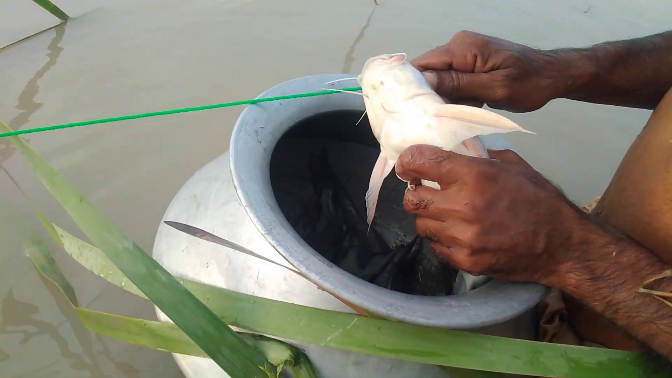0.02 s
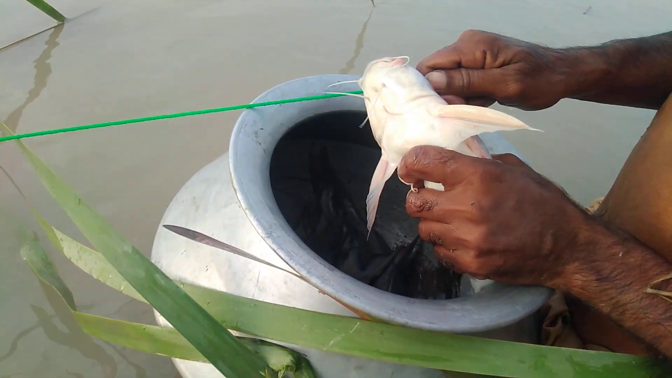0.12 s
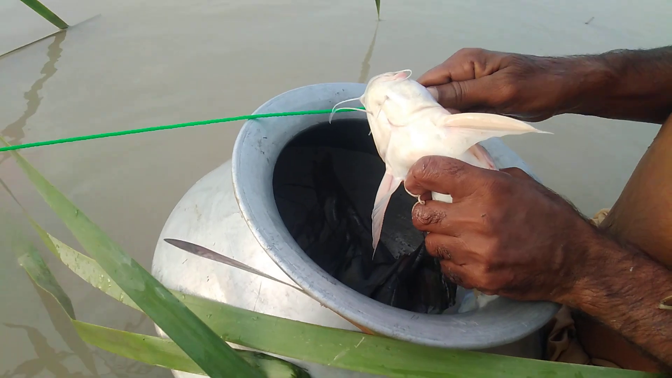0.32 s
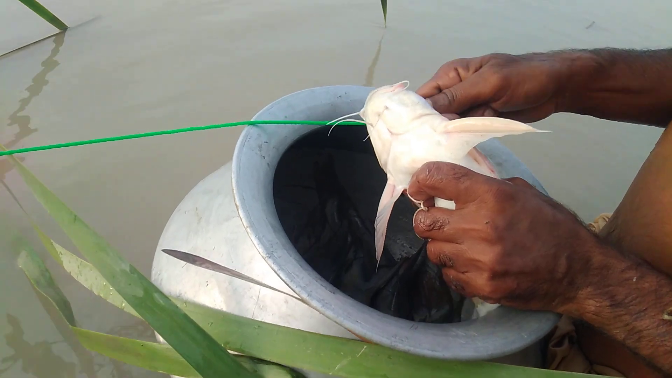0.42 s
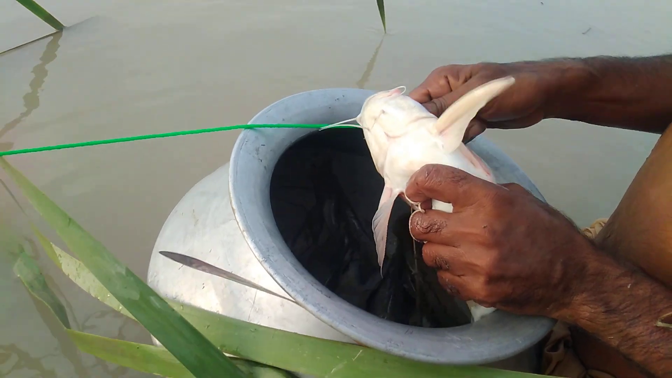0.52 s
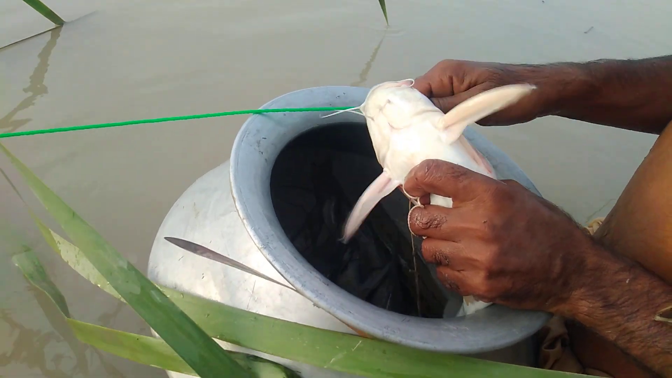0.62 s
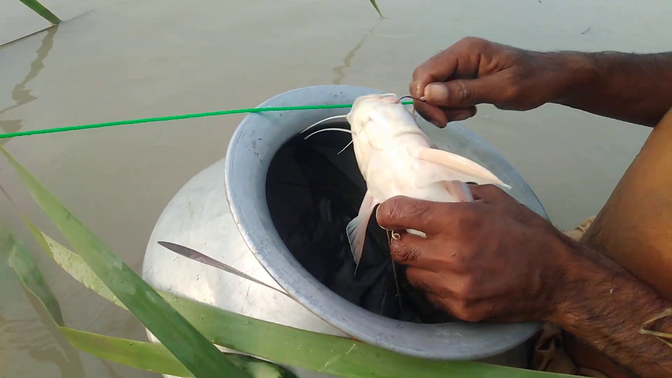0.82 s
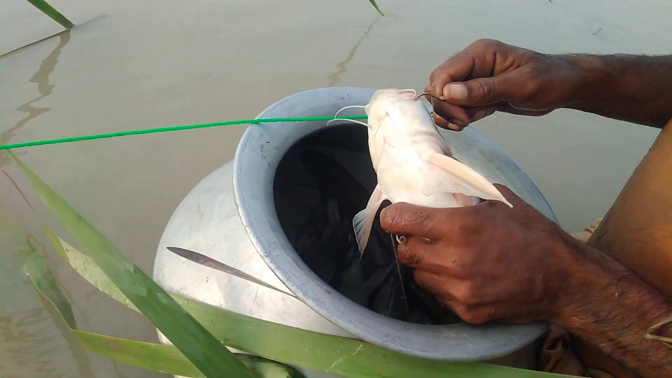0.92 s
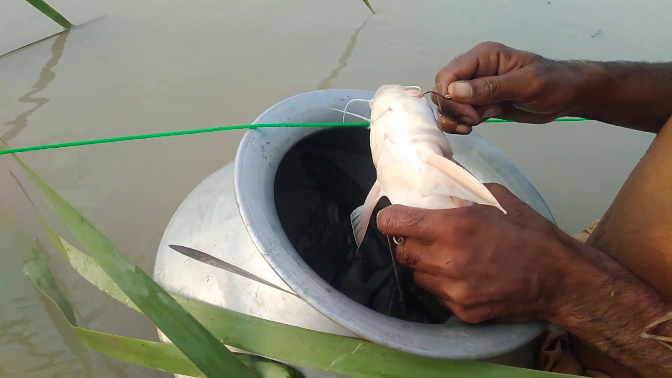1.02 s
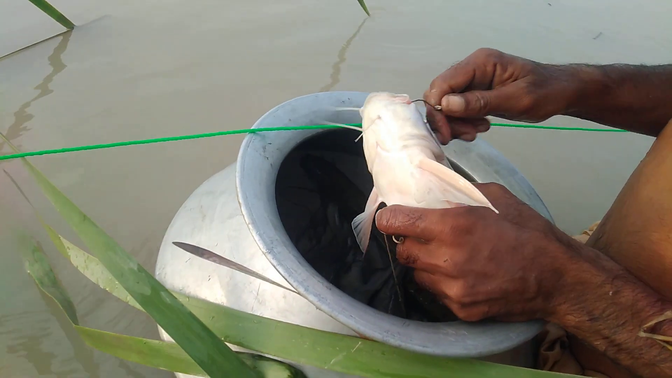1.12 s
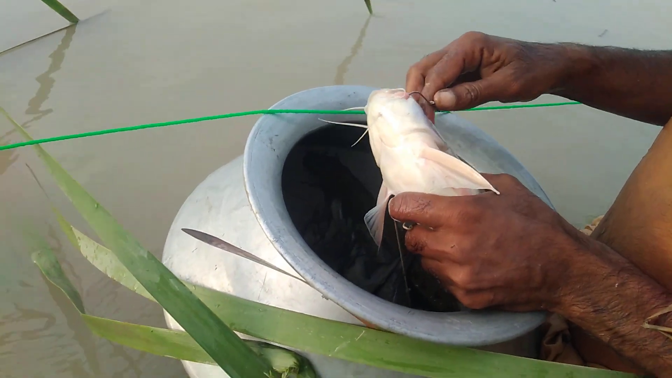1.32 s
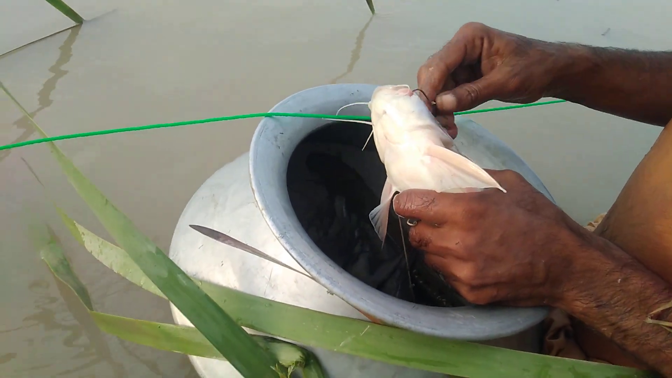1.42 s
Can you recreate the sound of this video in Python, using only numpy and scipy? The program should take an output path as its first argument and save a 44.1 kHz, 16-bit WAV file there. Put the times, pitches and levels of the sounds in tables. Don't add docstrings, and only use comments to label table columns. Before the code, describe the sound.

Three quick, rough fish croaks, buzzy and grating, between small scrapes and knocks on a metal pot.

```python
import sys
import numpy as np
from scipy import signal
from scipy.fft import rfft, irfft
from scipy.io import wavfile

SR = 44100
rng = np.random.default_rng(int(sys.argv[2]) if len(sys.argv) > 2 else 0)


def elevation(decibels):
    levels = np.asarray(decibels, float)
    return 10 ** (levels / 20)


def put_to_file(sound):
    columns = np.atleast_2d(sound).T
    safe = np.clip(columns, -1, 1)
    whole_steps = np.round(safe * 32767)
    wavfile.write(sys.argv[1], SR, whole_steps.astype(np.int16))


N = 63945
T = np.arange(N) / SR


def rms_one(x):
    return x / np.sqrt(np.mean(x ** 2) + 1e-20)


def resonate(x, peaks):
    out = 0
    for k, (hz, width_hz, db) in enumerate(peaks):
        r = np.exp(-np.pi * max(width_hz, 5) / SR)
        feed = [(1 - r * r) / 2, 0, (r * r - 1) / 2]
        back = [1, -2 * r * np.cos(2 * np.pi * hz / SR), r * r]
        out = out + (-1) ** k * elevation(db) * signal.lfilter(feed, back, x + 1e-18)
    return out


def resonate_twice(x, hz, width_hz):
    return resonate(resonate(x, [(hz, width_hz, 0)]), [(hz, width_hz, 0)])


def cut(x, hz, kind, order=2):
    return signal.sosfilt(signal.butter(order, hz, kind, fs=SR, output="sos"), x)


def coloured(points):
    hz, db = np.transpose(points)
    f = np.maximum(np.arange(N // 2 + 1) * SR / N, 1)
    gain = elevation(np.interp(np.log(f), np.log(hz), db, left=-90, right=-90))
    return rms_one(irfft(rfft(rng.standard_normal(N)) * gain, N))


def drift(rate_hz):
    r = np.exp(-2 * np.pi * rate_hz / SR)
    return rms_one(signal.lfilter([1], [1, -2 * r, r * r], rng.standard_normal(N + SR))[SR:])


def linger(x, fade_s, gain=None):
    r = np.exp(-1 / (fade_s * SR))
    return signal.lfilter([1 - r if gain is None else gain], [1, -r], x)


def stroke(s, rise_s, fade_s):
    rise = np.clip((T - s) / max(rise_s, 1e-4), 0, 1)
    return rise * np.exp(-np.maximum(T - s - rise_s, 0) / max(fade_s, 1e-3))


def sounding(effort_s, tail_s=0):
    opening = (T - effort_s[0]) / 0.0013
    closing = (effort_s[-1] + tail_s - T) / (0.0018 + tail_s)
    return np.clip(np.minimum(opening, closing), 0, 1)


def even(x, effort_s):
    return x / np.sqrt(np.mean(x[sounding(effort_s) > 0] ** 2))


def slip_hum(cycles, speed, rising, harmonics_db, sinks_db, effort_s, tail_s):
    first_sink = np.where(rising, sinks_db[0], sinks_db[1])
    sinks = [first_sink, sinks_db[2]] + [sinks_db[3]] * 4
    hum = 0
    for k, (db, sink) in enumerate(zip(harmonics_db, sinks)):
        level = elevation(db + 3.5 - sink * (1 - speed) ** 1.8 + 90 * 0 + 0)
        hum = hum + level * harmonic(cycles, k) * sounding(effort_s, tail_s if k == 0 else 0)
    return hum


def harmonic(cycles, k):
    return np.sin(2 * np.pi * (k + 1) * cycles + 0.87 * k * k)


def croak(effort, fin_stroke, rough, voice, harmonics_db, sinks_db, skull_peaks):
    # centre in Hz, width in Hz, level in dB.
    rasp_peaks = [(4100, 6000, -18), (7440, 860, -2), (10430, 1300, -8.5), (11570, 970, -4.5),
                  (14140, 1100, -1), (15440, 410, 2)]
    # centre in Hz, width in Hz, depth from 0 to 1.
    rasp_dips = [(8700, 840, 0.44), (13200, 500, .5), (5630, 410, 0.9)]
    # centre in Hz, width in Hz, level in dB rms.
    belly_peak = (208, 25, -57.5)
    # centre in Hz, width in Hz.
    throat_peak = (560, 220)
    jaw_peak = (950, 130)
    rest_hz = 201.7
    s, db = np.transpose(effort)
    top_s, top_hz, rise_s, fall_s, flat = fin_stroke
    jitter, flutter_db, clean = rough
    skull_db, clear_db, throat_db, jaw_db, tail_s = voice
    on = sounding(s)
    level_db = np.interp(T, s, db)

    rising = T < top_s
    speed = np.exp(-np.abs((T - top_s) / np.where(rising, rise_s, fall_s)) ** flat)
    cycles = np.cumsum((rest_hz + (top_hz - rest_hz) * speed) * (1 + jitter * drift(120))) / SR
    slips = np.diff(np.floor(cycles), prepend=0) * elevation(1.5 * rng.standard_normal(N))
    burst = 0.2 + 0.35 * speed + linger(slips, 0.0008, gain=1)
    bone_noise, rasp_noise = burst * rng.standard_normal((2, N))

    hum = slip_hum(cycles, speed, rising, harmonics_db, sinks_db, s, tail_s, flutter_db)
    belly = even(resonate_twice(bone_noise, *belly_peak[:2]), s)
    belly = elevation(belly_peak[2]) * sounding(s, 0.021) * belly

    drive = np.sqrt(clean) * even(slips, s) + np.sqrt(1 - clean) * even(bone_noise, s)
    bone = cut(resonate(drive, [(*jaw_peak, jaw_db)] + skull_peaks), 680, "high", order=4)
    bone = bone + elevation(throat_db) * resonate_twice(bone_noise, *throat_peak)
    follow_db = 1.37 * (level_db - db.max())
    skull_level = on * elevation(db.max() + skull_db + follow_db - clear_db * speed ** 2)
    skull = linger(skull_level, 0.0023) * even(bone, s)

    rasp = cut(resonate(rasp_noise, rasp_peaks), 2100, "high")
    for hz, width_hz, depth in rasp_dips:
        rasp = rasp - np.clip(depth, 0, 1) * resonate(rasp, [(hz, width_hz, 0)])
    grind = on * elevation(level_db)
    grind = np.maximum(grind, elevation(-14) * linger(grind, 0.013))
    return hum + belly + skull + grind * even(rasp, s)


def slip_hum(cycles, speed, rising, harmonics_db, sinks_db, effort_s, tail_s, flutter_db):
    first_sink = np.where(rising, sinks_db[0], sinks_db[1])
    sinks = [first_sink, sinks_db[2]] + [sinks_db[3]] * 4
    hum = 0
    for k, (db, sink) in enumerate(zip(harmonics_db, sinks)):
        level = elevation(db + 3.5 - sink * (1 - speed) ** 1.8 + flutter_db * drift(90))
        hum = hum + level * harmonic(cycles, k) * sounding(effort_s, tail_s if k == 0 else 0)
    return hum


def fish():
    # time in seconds, level in dB.
    efforts = [
        [(0.494, -54), (0.499, -45), (0.516, -40.5), (0.524, -45), (0.542, -42.5), (0.551, -49), (0.56, -63)],
        [(0.591, -44.5), (0.608, -40.5), (0.626, -37.5), (0.644, -39), (0.658, -39.5), (0.666, -39.5),
         (0.671, -33.5)],
        [(0.705, -40.5), (0.714, -42.5), (0.738, -42), (0.758, -39.5), (0.772, -40), (0.778, -49), (0.788, -52)],
    ]
    # fastest moment in seconds, top slips per second, rise in seconds, fall in seconds, flatness.
    fin_strokes = [(.525, 392, .025, .020, 2.01), (.626, 435, .036, .034, 2.2),
                   (.740, 456, .031, .026, 2.4)]
    # timing jitter as a share, flutter in dB, share of clean slips in the skull.
    roughness = [(.015, 1.5, .5), (.05, 3.5, .35), (.003, .5, .6)]
    # skull over rasp in dB, its loss at full speed in dB, throat in dB, jaw in dB, hum tail in seconds.
    voices = [(0, 2.5, -3, -8, .003), (0, -1, -9, 3, 0.012), (1.5, 17, -14, 4, 0.013)]
    # harmonics 1 to 6 of the slip rate at full speed, in dB rms.
    harmonics = [(-44, -43, -52, -61, -61, -56), (-46, -42, -55, -57, -60, -64),
                 (-46, -37.5, -51, -44, -52, -58)]
    # first harmonic on the rise, first on the fall, second, higher ones, in dB.
    sinks = [(36, 40, 15, 34), (24, 26, 14, 24), (18, 7, 60, 60)]
    # centre in Hz, width in Hz, level in dB.
    skulls = [
        [(1233, 115, 1), (1530, 220, -1.5), (2120, 106, -0.5), (2625, 77, 0.5), (3760, 1900, -13.5)],
        [(1480, 71, 5.5), (1650, 110, -1.5), (2000, 180, -7.5), (2360, 214, -6), (3620, 1940, -17)],
        [(1652, 92, 3), (1730, 155, 0), (2100, 410, -11), (2600, 73, -1), (3700, 830, -15)],
    ]
    croaks = zip(efforts, fin_strokes, roughness, voices, harmonics, sinks, skulls)
    voice = sum(croak(*rows) for rows in croaks)
    notch_hz, notch_width_hz = 5620, 1160
    return signal.lfilter(*signal.iirnotch(notch_hz, notch_hz / notch_width_hz, SR), voice)


def pot(voice):
    # centre in Hz, width in Hz, level in dB.
    wall = [(1105, 21, -13.5), (1222.4, 19, 1), (1340, 7.7, -13), (1560, 25, -16), (1705, 51.5, -2),
            (2235, 12, -13.5), (2788, 29, -17), (3277, 63, -16), (3625, 68, -19), (4280, 70, -21)]
    # centre in Hz, width in Hz, level in dB.
    scrape = [(1107, 400, 5.5), (1604, 576, 10.5), (2480, 1140, -0.5), (4070, 3700, -15)]
    # start in seconds, rise in seconds, fade in seconds, level in dB, brightness in dB.
    rubs = [(0.107, 0.0029, 0.012, -62, -16), (0.15, 0.0012, 0.0057, -60, -13),
            (.221, 0.0015, 0.0071, -63.5, -14), (0.427, 0.0024, 0.062, -65.5, -8),
            (0.567, 0.025, 0.012, -55, -16.5), (0.827, 0.0012, 0.029, -72, -16),
            (0.917, 0.0031, 0.012, -56.5, -7), (0.988, 0.0037, 0.013, -69, -11),
            (1.012, 0.00064, 0.0038, -60, -19), (1.057, 0.00074, 0.018, -52.5, -22),
            (1.147, 0.00064, 0.031, -58.5, -12), (1.1867, 0.00027, 0.018, -53, -6),
            (1.211, 0.0076, 0.051, -65, -13), (1.241, 0.0045, 0.023, -55.5, -14),
            (1.263, 0.0037, 0.0053, -55.5, -10), (1.404, 0.015, 0.031, -55.5, -9.5),
            (1.428, 0.0019, 0.018, -56, -13.5), (0.551, 0.003, 0.016, -50.5, -13.5),
            (0.798, 0.0034, 0.041, -62.5, -9), (0.678, 0.003, 0.029, -59.5, -3.5)]
    hits = (rng.random(N) < 5000 / SR) * rng.choice([-1, 1], N)
    grains = rms_one(hits * elevation(2 * np.minimum(rng.exponential(1, N), 4)))
    push = sum(elevation(db) * stroke(s, rise, fade) for s, rise, fade, db, _ in rubs)
    sheen = sum(elevation(db + bright) * stroke(s, rise, fade * 0.77) for s, rise, fade, db, bright in rubs)
    wall_gain = elevation(2.5) / np.std(resonate(grains, wall))
    scrape_gain = 1 / np.std(resonate(grains, scrape))
    ring = wall_gain * resonate(grains * push + elevation(-29) * voice, wall)
    body = scrape_gain * resonate(grains * push, scrape)
    return ring + body + sheen * rms_one(cut(grains, 4800, "high"))


def snap():
    # centre in Hz, width in Hz, level in dB.
    crack = [(1600, 280, 2.5), (2440, 840, -3), (3640, 2100, -5.5), (4940, 1370, -6), (8900, 12000, -16.5),
             (15000, 750, -6)]
    # centre in Hz, width in Hz, level in dB.
    answer = [(1222, 12, -7), (1572, 16, -3), (1798, 16, -10), (2272, 14, 6), (2702, 25, -14),
              (3208, 25, -14), (4430, 60, -12)]
    start_s = 0.371
    shape = stroke(start_s, 0.002, 0.0068) + elevation(-2) * stroke(start_s, 0.0017, 0.014)
    shape = elevation(-48) * shape
    white = rng.standard_normal(N)
    return shape * rms_one(resonate(white, crack)) + elevation(13.5) * resonate(shape * white, answer)


def knock():
    # time in seconds, peak in dB, centre in Hz, width in Hz.
    knocks = [(0.0019, -59, 340, 70), (.097, -60, 520, 40), (.118, -54, 343, 180), (.220, -54, 1100, 300),
              (.256, -62, 500, 24), (.3245, -44.5, 372, 76), (.3246, -47.5, 790, 480),
              (1.188, -50, 3100, 4400), (1.059, -56, 1800, 2300), (.4905, -46, 9000, 9000),
              (1.4291, -52, 1700, 900), (.9188, -57, 2500, 3000)]
    out = np.zeros(N)
    for s, db, hz, width_hz in knocks:
        click = 1.0 * (np.arange(N) == int(s * SR))
        tap = resonate(resonate(click, [(hz, width_hz, 0)]), [(hz, 4 * width_hz, 0)])
        tap = cut(tap, min(hz + 0.4 * width_hz + 200, 15000), "low", order=4)
        out += elevation(db) * tap / np.abs(tap).max()
    return out


def sing():
    # start in seconds, rise in seconds, fade in seconds, level in dB, pitch in Hz.
    sings = [(1.085, .008, .06, -67, 2280), (1.193, .004, .03, -65, 2280), (1.152, .008, .02, -70, 4300),
             (1.158, .006, .015, -70, 3660), (1.16, .004, .008, -61, 1560), (1.205, .006, .012, -70, 4300),
             (1.245, .018, .008, -67, 3700), (1.27, .012, .007, -66, 3260), (1.26, .004, .025, -71, 4300),
             (1.058, .003, .018, -59, 1710), (1.238, .004, .012, -58, 1690), (1.256, .006, .022, -59, 1225),
             (1.272, .006, .008, -61, 1740), (1.188, .003, .016, -59, 1222), (1.42, .01, .025, -54, 1715),
             (1.425, .01, .015, -67, 3700), (.382, .006, .025, -63, 2275), (.385, .006, .04, -65, 1575),
             (.752, .008, .012, -53, 2560), (.371, .002, .006, -49, 1600), (.39, .006, .03, -66, 1800),
             (.148, .004, .012, -66, 1700), (.148, .004, .014, -68, 1220), (.915, .004, .03, -64, 1222)]
    out = 0
    for s, rise_s, fade_s, db, hz in sings:
        level = elevation(db + 3.5 + 2.9 * drift(70)) * stroke(s, rise_s, fade_s)
        out = out + level * np.sin(2 * np.pi * hz * T)
    return out


def tick():
    # start in seconds, fade in seconds, level in dB, centre in Hz, width in Hz.
    ticks = [(1.189, .006, -63, 11200, 700), (1.2635, .002, -64, 8000, 3000),
             (1.388, .012, -69, 14600, 1500), (.680, .003, -63, 12300, 1200), (1.165, .006, -74, 9700, 300),
             (1.446, .004, -67, 15200, 1200)]
    white = rng.standard_normal(N)
    out = 0
    for s, fade_s, db, hz, width_hz in ticks:
        out = out + elevation(db) * stroke(s, 0.00095, fade_s) * rms_one(resonate_twice(white, hz, width_hz))
    return out


def insect():
    # start in seconds, end in seconds, level in dB.
    trills = [
        (0, 0.149, -76),
        (0.75, 0.84, -73),
        (1.28, 1.466, -77.5),
    ]
    on = sum(elevation(db) * np.clip(np.minimum(T - a, b - T) / 0.037, 0, 1) for a, b, db in trills)
    throb = (1.4 + 0.17 * np.sin(2 * np.pi * 45 * T)) ** 2
    return on * rms_one(throb * resonate(rng.standard_normal(N), [(6155, 70, 0)]))


def wind():
    # time in seconds, level in dB.
    gusts = [(0.0, -50), (0.152, -59.5), (0.226, -41.5), (0.258, -51), (0.278, -42.5), (0.568, -59),
             (0.634, -54.5), (0.65, -59), (0.86, -58), (0.88, -51.5), (0.968, -57.5), (1.372, -55),
             (1.4, -64), (1.45, -49.5)]
    # frequency in Hz, level in dB per Hz.
    rumble = [(12, -21), (20, 2.5), (59, -4), (97, -13.5), (171, -17.5), (203, -21), (260, -49), (340, -57),
              (570, -120)]
    return elevation(np.interp(T, *np.transpose(gusts)) + 1.8 * drift(26)) * coloured(rumble)


def open_air():
    # frequency in Hz, level in dB per Hz.
    murmur = [(65, -25.5), (110, 3.0), (366, -14.0), (990, -18), (1220, -16.5), (1500, -18.5),
              (1700, -18.0), (3030, -29), (15600, -36), (17000, -12.5)]
    return elevation(-61.5 + 0.27 * drift(18)) * coloured(murmur)


def scene():
    voice = fish()
    handling = pot(voice) + snap() + knock() + sing() + tick()
    return (voice + handling + insect() + wind() + open_air())[None]


def roll_off(x):
    return signal.sosfilt(signal.butter(12, 17000, fs=SR, output="sos"), x)


def record(dry):
    hiss = elevation(-74.5) * rms_one(cut(rng.standard_normal(N), 12100, "high"))
    hz = np.arange(N // 2 + 1) * SR / N
    top_cut = elevation(-70 * np.clip((hz - 15720) / 250, 0, 1) ** 1.5)
    return roll_off(irfft(rfft(dry + hiss) * top_cut, N))


dry = scene()
out = record(dry)
put_to_file(out)
```